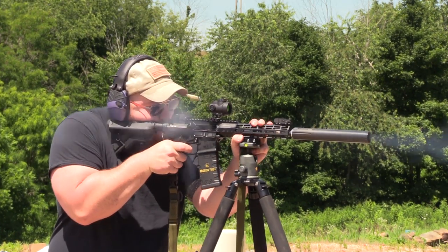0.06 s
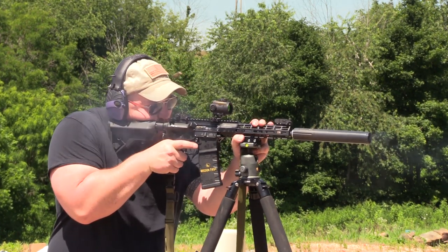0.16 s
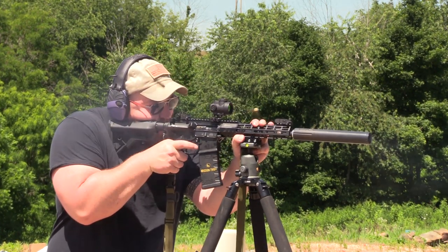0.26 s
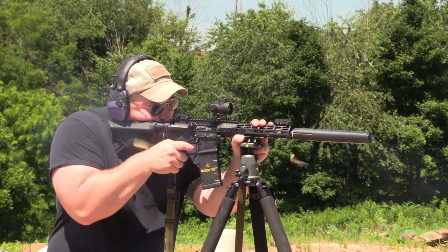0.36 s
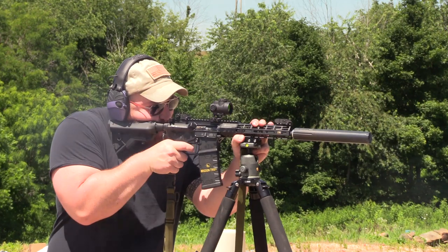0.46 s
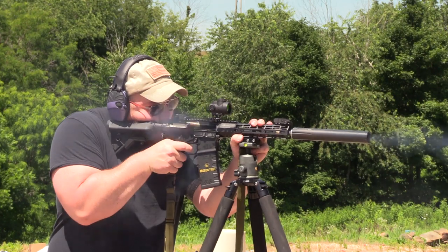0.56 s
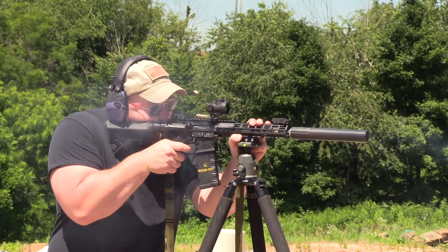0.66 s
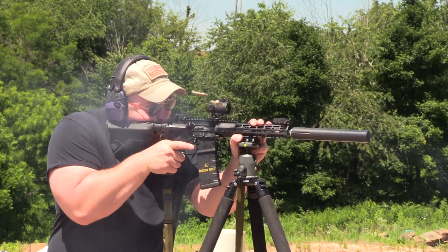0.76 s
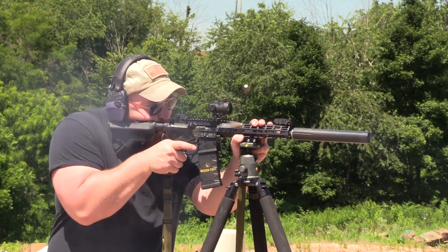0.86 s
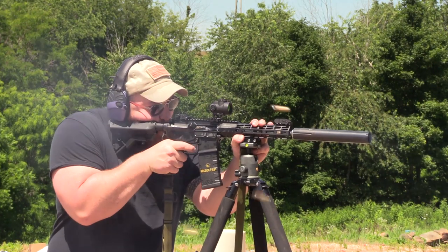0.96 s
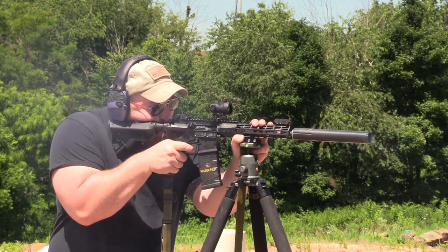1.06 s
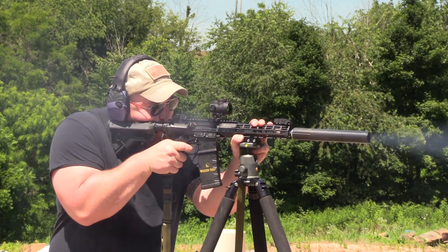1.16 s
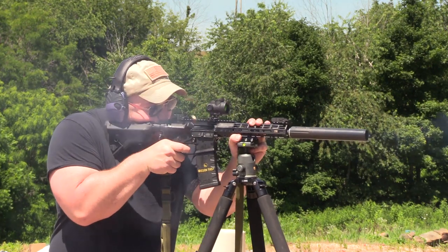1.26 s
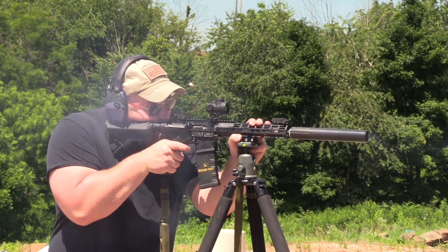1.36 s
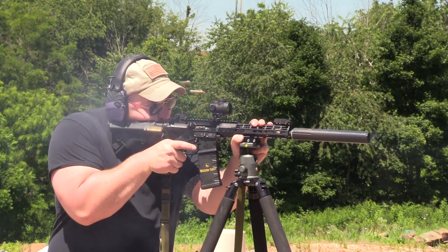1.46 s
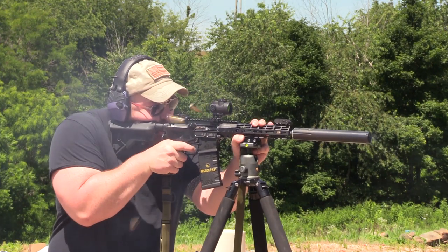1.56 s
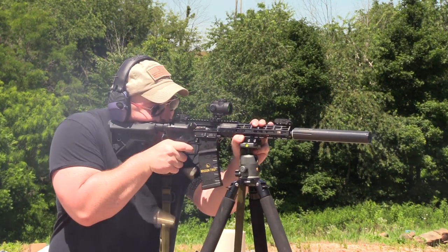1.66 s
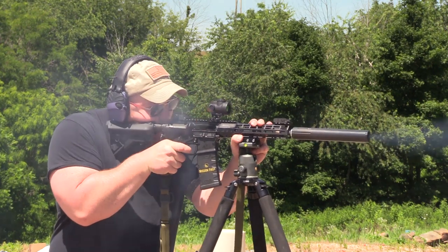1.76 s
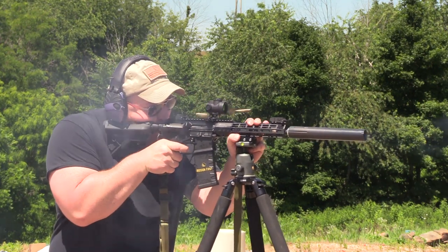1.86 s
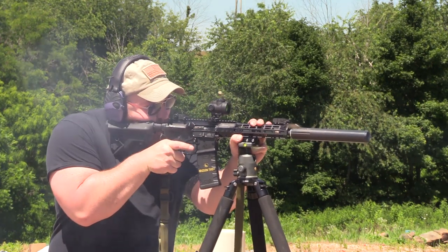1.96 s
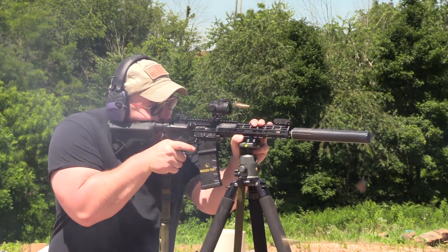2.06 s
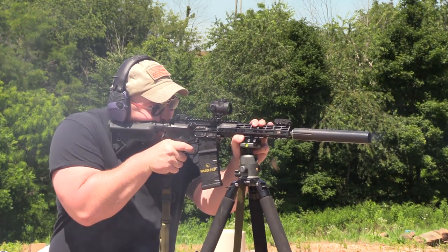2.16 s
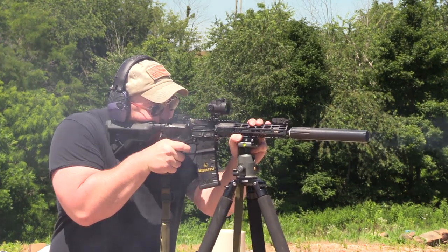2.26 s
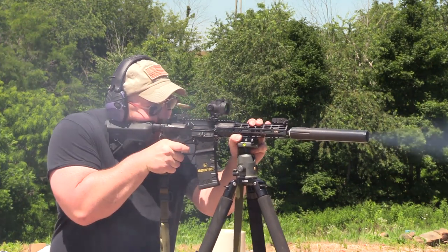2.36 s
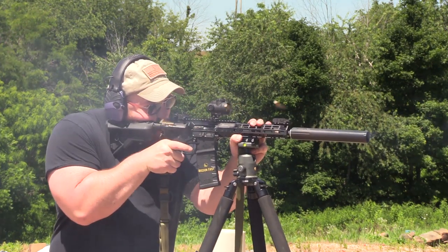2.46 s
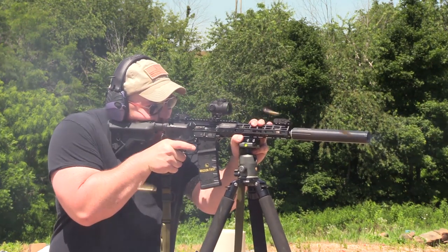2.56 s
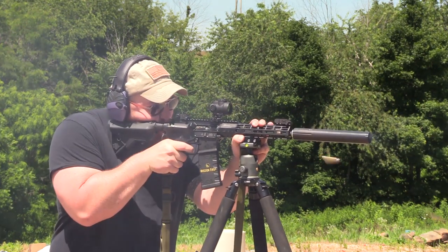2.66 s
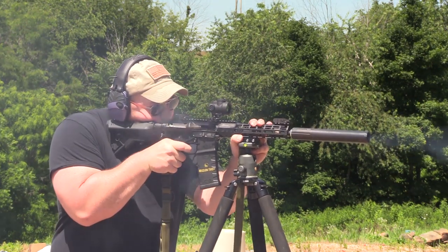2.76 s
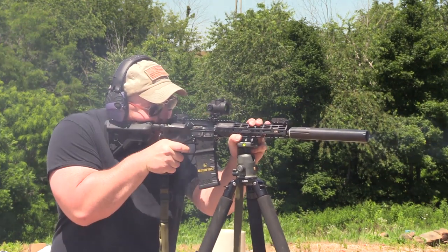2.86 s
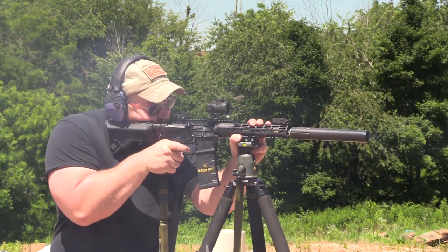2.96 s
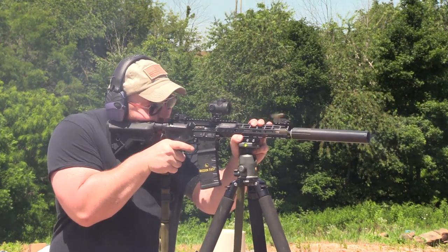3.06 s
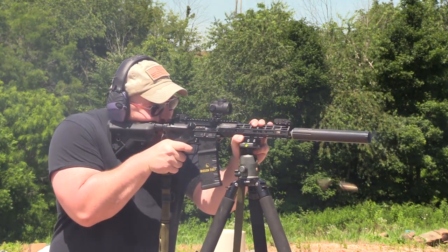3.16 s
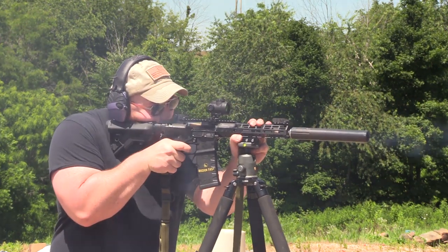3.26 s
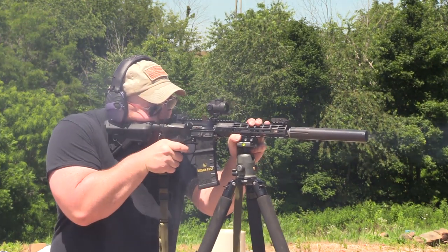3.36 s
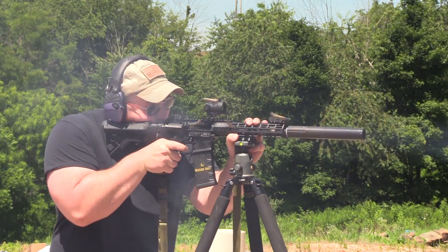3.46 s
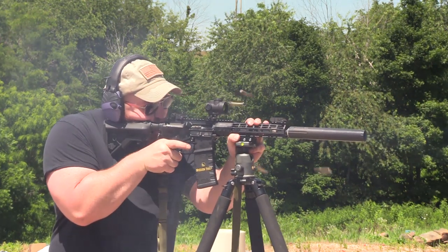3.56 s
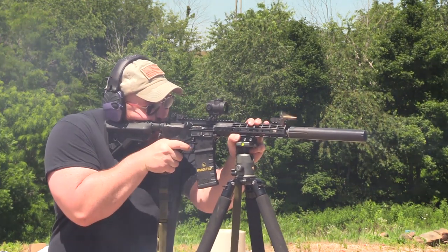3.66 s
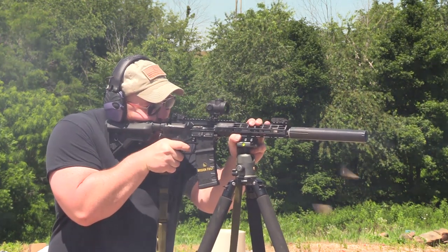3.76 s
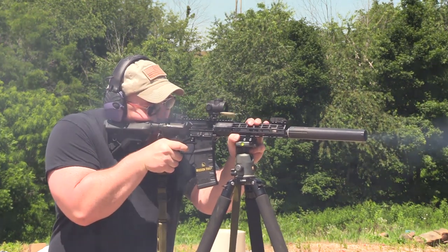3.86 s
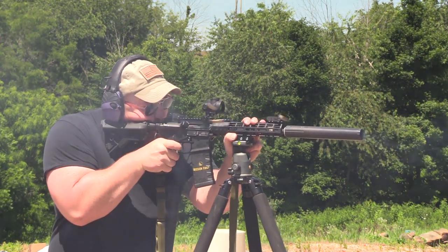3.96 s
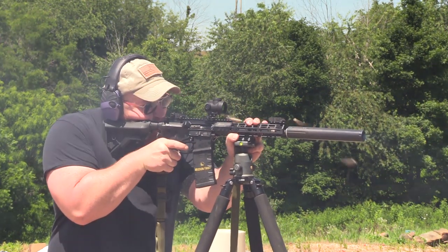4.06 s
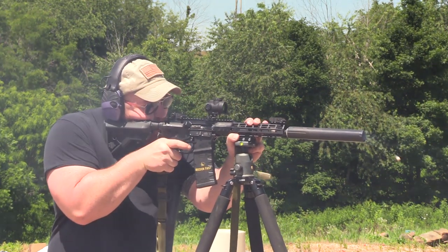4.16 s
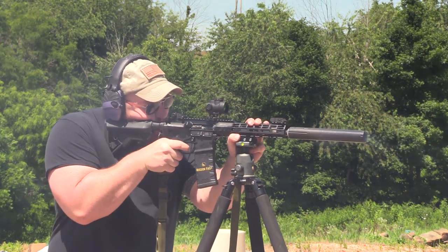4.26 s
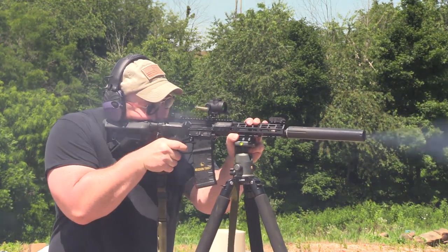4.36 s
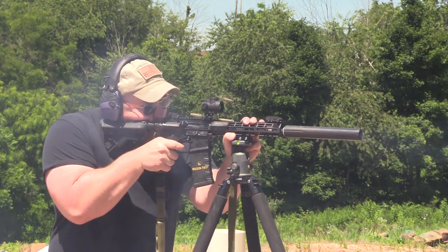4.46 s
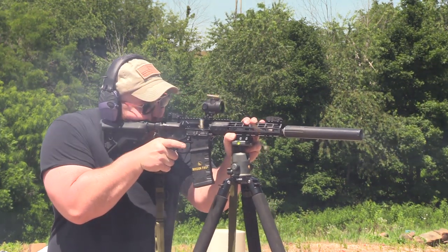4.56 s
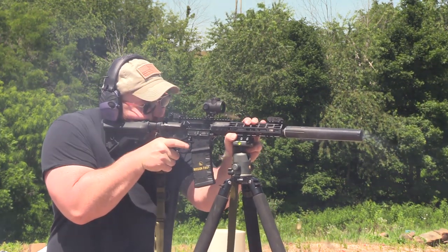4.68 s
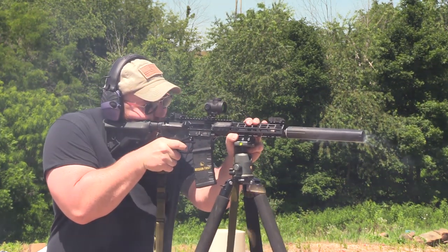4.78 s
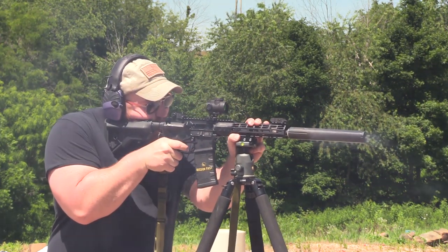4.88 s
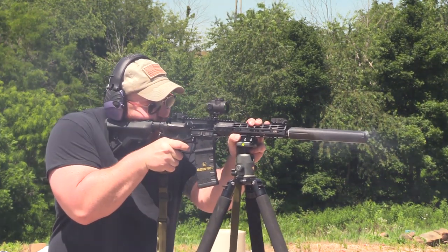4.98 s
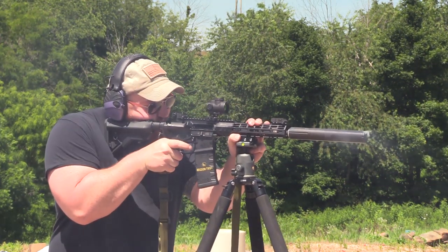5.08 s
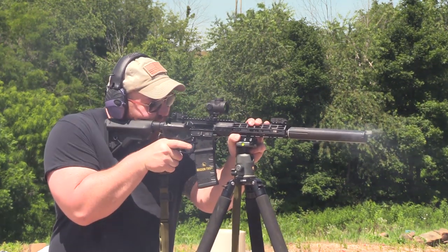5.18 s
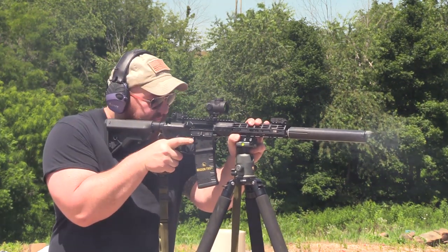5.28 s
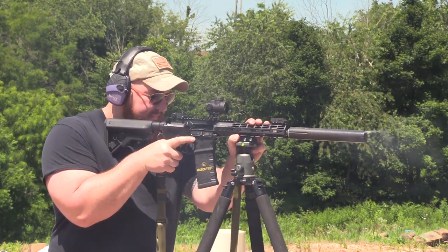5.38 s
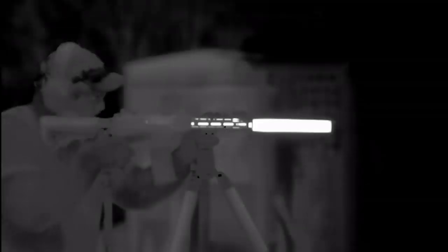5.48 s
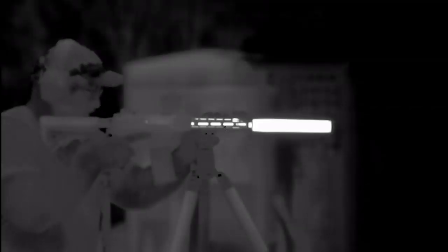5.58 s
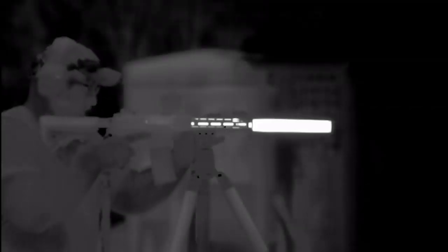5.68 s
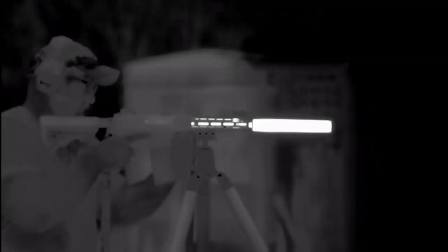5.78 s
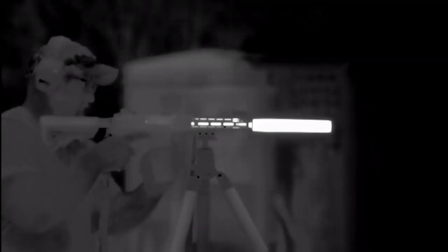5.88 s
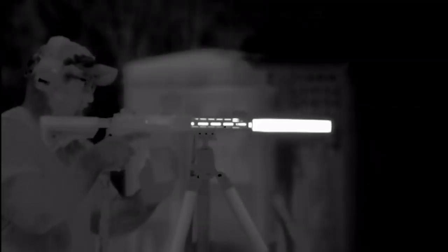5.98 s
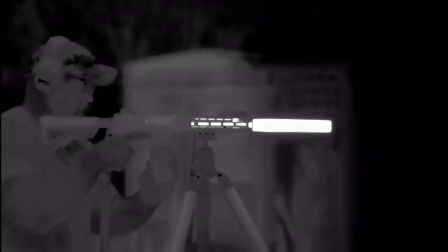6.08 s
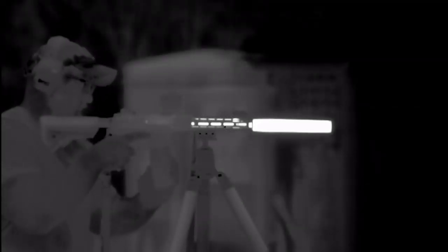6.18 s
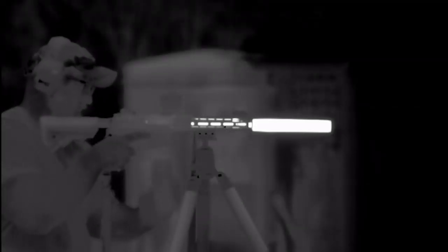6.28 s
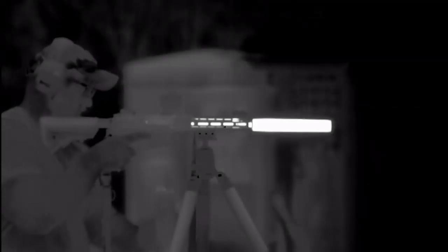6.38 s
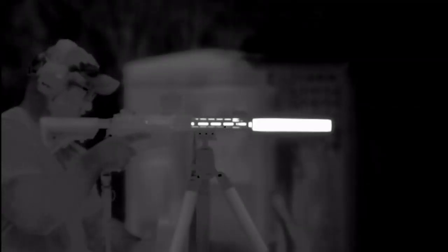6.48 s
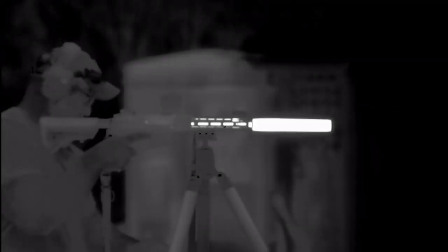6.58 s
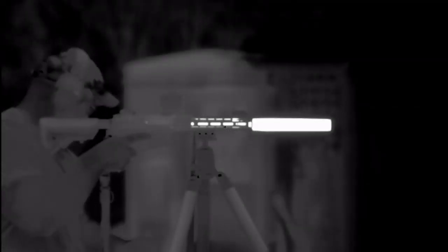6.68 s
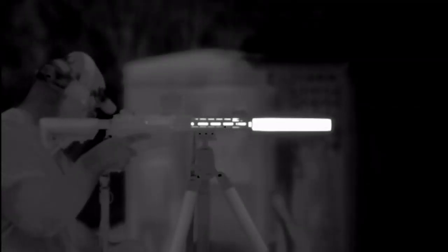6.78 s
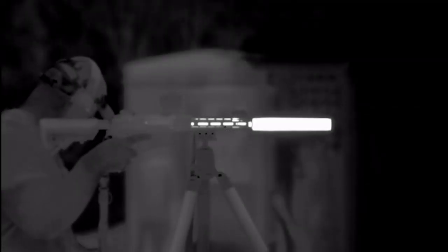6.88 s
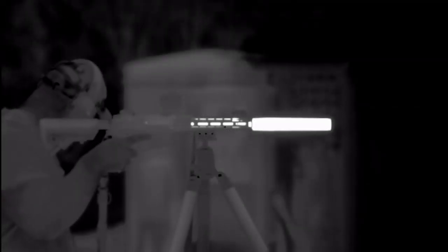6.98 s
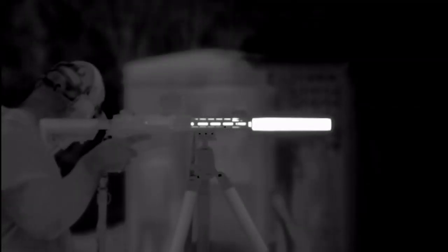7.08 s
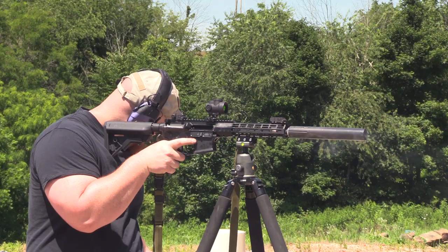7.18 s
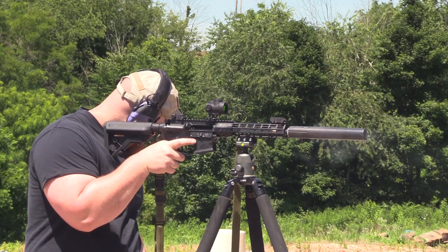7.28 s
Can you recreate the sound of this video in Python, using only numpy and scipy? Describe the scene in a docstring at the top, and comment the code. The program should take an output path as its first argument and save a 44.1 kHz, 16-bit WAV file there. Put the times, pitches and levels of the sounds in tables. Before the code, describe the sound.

Close beside the shooter on a tree-lined range, a suppressed rifle rattles off quick bursts of two to four shots, about two bursts a second. The blasts distort slightly and echo through the forest while spent cases tinkle on the ground. Once the firing stops, faint motors throb in the distance, and soft knocks on the rifle surround a single sharp catch click and a brief metallic scrape.

```python
"""A suppressed automatic rifle opens fire on a range ringed by trees: nine short bursts of gas and
clacking steel. Each blast overloads the microphone and ducks the gain. Bullets thud into the far berm,
the forest's echo swells back and spent brass tinkles on the ground. After the last burst the cases
skitter to rest and the beating hum of two distant motors comes up as the gain recovers. Then the rifle
is handled: light knocks, one sharp click of a catch, a short metal slide and a few more knocks."""
import sys
import numpy as np
from scipy import signal
from scipy.fft import rfft, irfft, next_fast_len
from scipy.io import wavfile
from scipy.ndimage import minimum_filter1d

SR = 44100
rng = np.random.default_rng(int(sys.argv[2]) if len(sys.argv) > 2 else 0)


def log_audio(samples):
    """Write samples as a 16-bit WAV file to the path given in sys.argv[1]."""
    # one column per channel
    frames = np.atleast_2d(samples).T
    # limit to full scale, then quantise
    limited = np.clip(frames, -1, 1)
    pcm = np.round(limited * 32767).astype(np.int16)
    wavfile.write(sys.argv[1], SR, pcm)


N = 323253
TIME = np.arange(N) / SR

# bursts of fire: t/s, rounds, cycle/s, first round's gas/dB and wave/dB, later rounds' gas/dB and wave/dB
BURSTS = [(.0668, 2, 0.072, -2, -14, -7.5, -21), (0.6297, 3, .0712, 2, -8, 0.26, -11),
          (1.2485, 3, 0.07, 2, -8.5, 0.5, -14), (1.7709, 3, .0678, 0.7, -2.5, 1.5, -13.5),
          (2.3163, 3, 0.068, 2, -9.5, 1.5, -13), (2.8335, 3, .0669, 2.5, 1, 1.5, -9.5),
          (3.3317, 4, .0654, 1, -12.5, 2, -9.5), (3.8783, 3, .066, 3.5, 2, 2.5, -8.5),
          (4.3863, 4, .0632, 2, -2.5, 3, -9)]
# slaps off the nearby berms: delay/s, level/dB
BERM_ECHOES = [(.041, -10), (.064, -6.5), (0.097, -10), (.119, -17.5), (.167, -39)]
# spent cases landing: t/s, tick/dB, ring/dB
CASE_LANDINGS = [(1.06, -44, -50.5), (1.51, -38, -34), (2.08, -44, -42), (2.60, -40, -39.5),
                 (3.155, -40, -42), (3.62, -26, -23), (4.24, -40, -39), (5.087, -28.5, -39),
                 (5.187, -33, -34), (5.23, -34, -52), (5.306, -36, -60), (5.467, -43.5, -73)]
# handling knocks on the rifle: t/s, knock/dB, bright tick/dB, rattle t60/s
KNOCKS = [(5.985, -35.5, -46, .095), (6.207, -33, -56, .025), (6.347, -38, -59, .028),
          (6.38, -34, -65, 0.026), (6.476, -45.5, -64, .04), (6.854, -28.5, -47, .06),
          (6.961, -35.5, -52.5, .11), (7.065, -37, -55, .18), (7.099, -45, -41.5, 0.027),
          (7.138, -42, -64, .09), (7.158, -39, -54, .08)]
# two distant motors beating, with overtones: f/Hz, level/dB
MOTOR_TONES = [(92.0, -52), (100.8, -51), (145.3, -62.5), (258.4, -66.5), (328.4, -63.5)]

# ringing modes: f/Hz, level/dB, t60/s
SUPPRESSOR_MODES = [(253, 10.5, .05)]  # hollow note of the gas in the suppressor
BRASS_MODES = [(10720, -3.5, 0.22), (10800, -9.5, .2), (15130, -6.5, .25), (15260, -4.5, .19)]  # tinkle of a spent case
RIFLE_MODES = [(523, -18, .05), (745, -13, 0.047), (994, -9.5, 0.047), (1201, -5, 0.039), (1350, -7, 0.032),
               (1958, -23, .025)]  # woody knock of the rifle's body
CATCH_MODES = [(3290, -25.5, 0.044), (3710, -27, 0.022), (3840, -30, .028)]  # ping of the steel catch

# noise colours: f/Hz, relative level/dB
GAS_COLOUR = [(60, -7.5), (250, -3.5), (450, -12.5), (800, -6), (1500, -2.5), (2600, 0), (3500, 3),
              (5000, -5), (8000, -10.5), (12000, -14.5), (16000, -15.5)]  # broad spit of the muzzle jet
RECEIVER_COLOUR = [(200, -7.5), (800, -10), (1600, -11), (2800, -8), (3800, 6.5), (5000, -4.5),
                   (8000, -7.5), (15000, -17.5)]  # bright clatter of the receiver
STEEL_COLOUR = [(300, -13), (1500, -5), (2600, -5), (3500, 1), (4800, -9.5), (8000, -13), (15000, -17)]  # steel meeting steel
BODY_COLOUR = [(100, -21.5), (300, -21), (550, -5), (820, -7.5), (985, 7.5), (1130, -15), (1380, -2.5),
               (1700, -11.5), (3000, -21), (8000, -44.5)]  # hollow rattle of the rifle's body
TREE_COLOUR = [(40, -18), (170, 4), (350, -14), (800, -19.5), (1600, -17.5), (3000, -7), (4000, 7.5),
               (5500, -1), (9000, -16), (15000, -27)]  # thump and sizzle off the near trees
BRUSH_COLOUR = [(100, -8.5), (300, -6), (900, -12), (2000, -3.5), (3800, 4), (5200, -8), (8000, -16),
                (15000, -30.5)]  # hissy scatter off the brush
FOREST_COLOUR = [(100, 0.5), (300, -7), (900, -7.5), (2000, -1), (3700, 0.5), (5000, -8.5), (7000, -19.5),
                 (10000, -31.5), (15000, -36)]  # soft-topped tail from the deep forest
BERM_COLOUR = [(150, -9.5), (400, -5.5), (750, -13), (1200, -5.5), (1900, -2), (3000, 1.5), (6000, -22.5),
               (14000, -46.5)]  # midrange slap off the nearby berms
BOOM_COLOUR = [(60, -20), (130, -3), (180, 0.5), (280, -5.5), (500, -22.5), (1500, -50)]  # bass thrown back by the side berm
TREE_LINE_COLOUR = [(500, -24.5), (1500, -5), (3300, 2), (5000, -5.5), (9000, -25.5)]  # thin slap off the trees behind the range
THUD_COLOUR = [(300, -23), (550, -8), (750, -1), (1150, -9.5), (1800, -1.5), (2800, -9), (6000, -31)]  # a bullet striking the far berm
CASE_TICK_COLOUR = [(800, -30), (2500, -16), (4000, 6), (8000, -7), (12000, -13), (16000, -8)]  # brass touching the ground
AIR_COLOUR = [(15, -43), (25, -22), (76, -12.5), (102, -7), (145, -11), (335, -16.5), (439, -17.5),
              (516, -14), (641, -23), (695, -17), (962, -27.5), (1100, -24), (1290, -28.5), (3720, -39.5),
              (16000, -70.5)]  # open-air rumble


def muzzle(jet_db=24, jet_t60=.05, push_db=23, push_s=.0024, stretch=2.4, push_t60=.11, ground_s=.00315):
    """A jet of turbulent gas, heard again off the ground, rides on one slow pressure wave."""
    times, gas_db, wave_db = shots()
    jet = noise(GAS_COLOUR) * envelope(times, gas_db + jet_db, decay(jet_t60))
    # push, suction, rebound: each swing is longer than the one before
    age = TIME / push_s
    swing = np.sin(np.pi * np.log(1 + age) / np.log(stretch))
    pulse = swing * (1 - np.exp(-age)) * decay(push_t60)  # the suppressor softens the front
    wave = signal.fftconvolve(strikes(times, from_db(wave_db + push_db)), pulse)[:N]
    # a bigger push rings the suppressor harder
    hollow = ringing(times, gas_db + .38 * wave_db, SUPPRESSOR_MODES, spread_db=2.5)
    return wave + hollow + jet + .3 * delayed(jet, ground_s)


def shots():
    """The action cycles evenly through each burst: arrays of t/s, gas/dB, wave/dB."""
    rows = []
    for start, rounds, cycle_s, first_gas_db, first_wave_db, gas_db, wave_db in BURSTS:
        rows.append((start, first_gas_db, first_wave_db))
        rows += [(start + k * cycle_s, gas_db, wave_db) for k in range(1, round(rounds))]
    return np.transpose(rows)


def action(hammer_lead_s=.0091, buffer_s=.025, bolt_s=.055):
    """The hammer falls, the shot rings the receiver, the bolt clacks on the buffer and runs home."""
    times, gas_db, _ = shots()
    hammer = envelope(times - hammer_lead_s, -41, decay(t60=.04))
    receiver = envelope(times, gas_db - 5, decay(t60=.31))
    buffer = envelope(times + buffer_s, -13, decay(t60=.05))
    bolt = envelope(times + bolt_s, -11, decay(t60=.07))
    clatter = noise(RECEIVER_COLOUR) * (receiver + buffer) + noise(STEEL_COLOUR) * (hammer + bolt)
    return clatter * flutter(.001, depth_db=4)


def woodland(rise_s=.047, forest_rise_s=.5):
    """Near trees and brush scatter each shot back at once; the deep forest answers in a late swell."""
    times, gas_db, _ = shots()
    attack = np.minimum(TIME / rise_s, 1)
    trees = noise(TREE_COLOUR) * envelope(times, gas_db - 15, attack ** 2 * decay(t60=.28, hold=.099))
    brush = noise(BRUSH_COLOUR) * envelope(times, gas_db - 9, attack * decay(t60=.48))
    swell = np.minimum(TIME / forest_rise_s, 1) ** 2.4 * decay(t60=1.4, hold=forest_rise_s)
    forest = noise(FOREST_COLOUR) * envelope(times, gas_db - 48, swell)
    return (trees + brush) * flutter(.0024, depth_db=1.5) + forest


def slapbacks(boom_s=.066, tree_line_s=.26):
    """Each shot slaps off the nearby berms, booms off the side berm and returns thin off the tree line."""
    times, gas_db, _ = shots()
    delays, echo_db = np.transpose(BERM_ECHOES)
    taps = envelope(delays, echo_db, decay(t60=.11))
    berms = noise(BERM_COLOUR) * envelope(times, gas_db, taps)
    boom = noise(BOOM_COLOUR) * envelope(times + boom_s, gas_db - 17, decay(t60=.04, hold=.018))
    late_slap = envelope(times + tree_line_s, gas_db - 37, decay(t60=.07, hold=.018))
    return berms + boom + noise(TREE_LINE_COLOUR) * late_slap


def bullet_thuds(round_trip_s=.2355):
    """Each bullet flies to the far berm and its thud travels back."""
    times, _, _ = shots()
    return noise(THUD_COLOUR) * envelope(times + round_trip_s, -31, decay(t60=.045, hold=.003))


def cases(other_end_s=.01, other_end_db=-5):
    """A case lands on one end, then slaps down with the other; each touch ticks and rings the brass."""
    other_end = np.array(CASE_LANDINGS) + [other_end_s, other_end_db, other_end_db]
    times, tick_db, ring_db = np.vstack([CASE_LANDINGS, other_end, skitter()]).T
    ticks = noise(CASE_TICK_COLOUR) * envelope(times, tick_db, decay(t60=.006))
    return ticks + ringing(times, ring_db, BRASS_MODES, spread_db=1)


def skitter(count=11, start_s=5.34, length_s=.4, tick_db=-43, ring_db=-57, fade_db_per_s=20):
    """The last cases skitter to rest in uneven, fading touches: rows of t/s, tick/dB, ring/dB."""
    timing, softness = rng.random((count, 2)).T
    age = length_s * (np.arange(count) + timing) / count
    loss_db = fade_db_per_s * age + 6 * (softness - .5)
    return np.transpose([start_s + age, tick_db - loss_db, ring_db - loss_db])


def handling(catch_s, catch_knock_db=-28, catch_crack_db=-24.5, catch_t60=.04, rattle_db=-7):
    """Knocks ring and rattle in the rifle, and the catch snaps once with a bright crack of steel."""
    body, steel = from_db(rattle_db) * noise(BODY_COLOUR), noise(STEEL_COLOUR)
    blows = list(KNOCKS) + [(catch_s, catch_knock_db, catch_crack_db, catch_t60)]
    times, levels_db, _, _ = np.transpose(blows)
    sound = ringing(times, levels_db, RIFLE_MODES, spread_db=4)
    sound += ringing([catch_s], 0, CATCH_MODES, spread_db=3)
    for start, knock_db, tick_db, t60 in blows:
        at = int(start * SR)
        rattle = from_db(knock_db) * body[at:] + from_db(tick_db) * steel[at:]
        sound[at:] += rattle * decay(t60)[:N - at]
    return sound


def slide(start_s, length_s=.13, fade_db_per_s=50, hollow_db=-34.5, rasp_db=-38):
    """Freed by the catch, steel sticks and slips along steel to a stop; the hollow body sounds with it."""
    speed = from_db(-fade_db_per_s * TIME) * decay(t60=.27, hold=length_s)
    rubbing = from_db(hollow_db) * noise(BODY_COLOUR) + from_db(rasp_db) * noise(STEEL_COLOUR)
    return rubbing * delayed(speed, start_s) * flutter(.0011, depth_db=2.5)


def motors_and_air(in_step_s=6.664, air_db=-52):
    """Two distant motors drift in and out of step, throbbing over a bed of open-air rumble."""
    hum = sum(from_db(db) * np.sqrt(2) * np.cos(2 * np.pi * hz * (TIME - in_step_s))
              for hz, db in MOTOR_TONES)
    return hum + from_db(air_db) * noise(AIR_COLOUR)


def from_db(db):
    """Decibels to gain."""
    return 10 ** (np.asarray(db) / 20)


def unit_rms(x):
    """Scale to rms 1."""
    return x / np.sqrt(np.mean(x ** 2) + 1e-20)


def smooth(x, seconds):
    """Two one-pole lags in series."""
    pole = np.exp(-1 / (seconds * SR))
    for _ in range(2):
        x = signal.lfilter([1 - pole], [1, -pole], x + 1e-18)
    return x


def delayed(x, seconds):
    """The same sound, later."""
    return np.interp(TIME - seconds, TIME, x, left=0)


def noise(colour):
    """Noise of rms 1 with the given colour."""
    hz, db = np.transpose(colour)
    size = next_fast_len(N)
    bin_hz = np.maximum(np.arange(size // 2 + 1) * SR / size, 1)
    gain = from_db(np.interp(np.log(bin_hz), np.log(hz), db))
    return unit_rms(irfft(rfft(rng.standard_normal(size)) * gain, size)[:N])


def flutter(seconds, depth_db):
    """Grain: a random gain that wavers on the given time scale."""
    wander = unit_rms(smooth(rng.standard_normal(N), seconds))
    return unit_rms(from_db(depth_db * wander))


def strikes(times, gains):
    """One impulse for each hit."""
    impulses = np.zeros(N)
    np.add.at(impulses, np.round(np.asarray(times) * SR).astype(int), gains)
    return impulses


def decay(t60, hold=0):
    """An envelope that holds, then falls 60 dB in t60 seconds."""
    return from_db(-np.minimum(60 * np.maximum(TIME - hold, 0) / t60, 200))


def envelope(times, db, shape):
    """Each hit triggers the shape at its level; overlapping tails add in power."""
    power = signal.fftconvolve(strikes(times, from_db(db) ** 2), shape ** 2)[:N]
    return np.sqrt(np.maximum(power, 0))


def ringing(times, db, modes, spread_db):
    """Each hit sets every mode ringing with a random strength of its own."""
    scatter_db = rng.normal(0, spread_db, (len(times), len(modes)))
    sound = np.zeros(N)
    for k, (hz, mode_db, t60) in enumerate(modes):
        mode = np.sin(2 * np.pi * hz * TIME) * decay(t60)
        sound += signal.fftconvolve(strikes(times, from_db(db + mode_db + scatter_db[:, k])), mode)[:N]
    return sound


def scene(catch_s=6.7423):
    """The mono mix at one microphone beside the shooter."""
    firing = muzzle() + action() + woodland() + slapbacks() + bullet_thuds() + cases()
    return (firing + handling(catch_s) + slide(catch_s) + motors_and_air())[None]


def record(dry, clip_db=17, threshold_db=-5, hold_s=.24, release_s=.31, squeeze_db=40, squeeze_s=.019):
    """The input clips; a limiter ducks at once, holds and lets go slowly, digging deeper in a burst."""
    ceiling = from_db(clip_db)
    clipped = np.clip(dry[0], -ceiling, ceiling)
    over_db = np.maximum(20 * np.log10(np.abs(clipped) + 1e-9) - threshold_db, 1e-6)
    half_hold = int(hold_s * SR / 2)
    held_db = -minimum_filter1d(-over_db, 2 * half_hold + 1, origin=half_hold, mode="nearest")
    # the duck jumps to each new peak, then relaxes exponentially
    release = TIME / release_s
    duck_db = np.exp(np.maximum.accumulate(np.log(held_db) + release) - release)
    duck_db += squeeze_db * smooth((clipped / ceiling) ** 2, squeeze_s)
    lowpass = signal.firwin(161, cutoff=15900, fs=SR)
    return signal.fftconvolve(clipped * from_db(-duck_db), lowpass, "same")[None]


dry = scene()
out = record(dry)
log_audio(out)
```